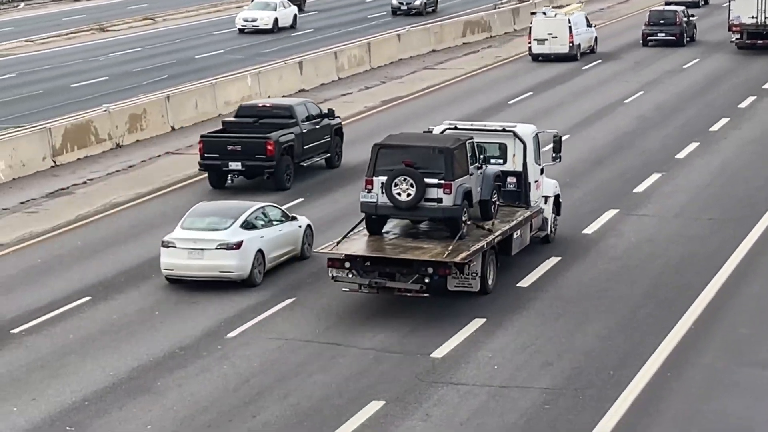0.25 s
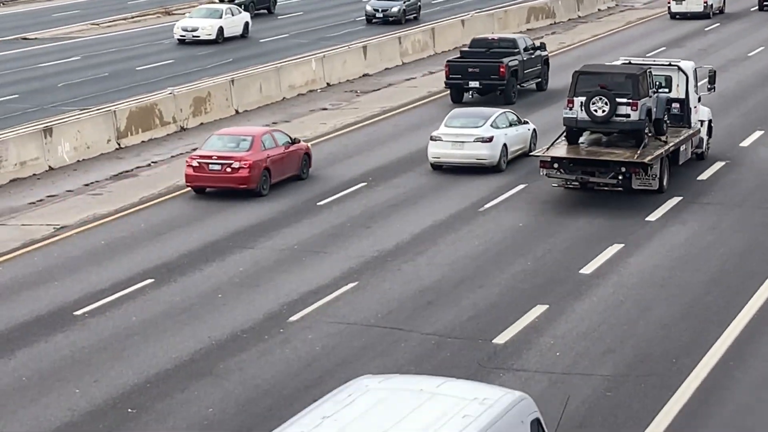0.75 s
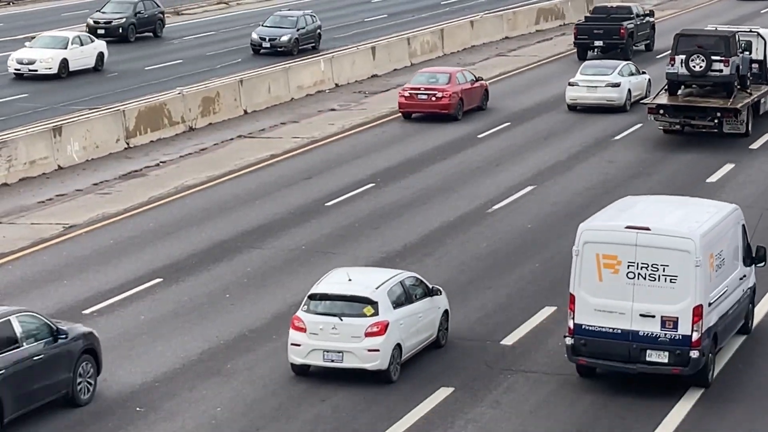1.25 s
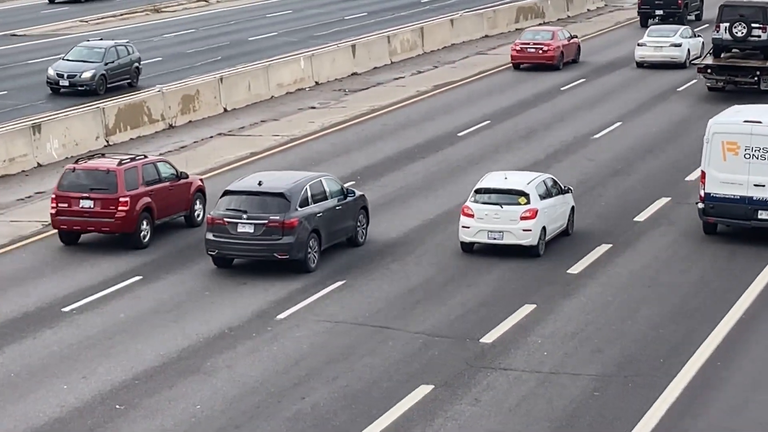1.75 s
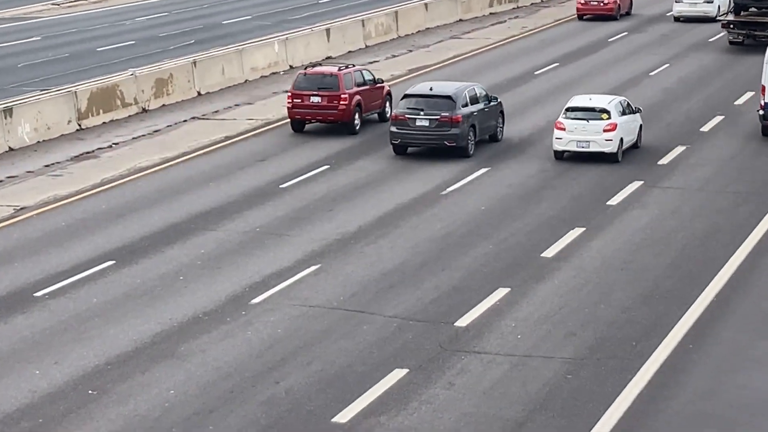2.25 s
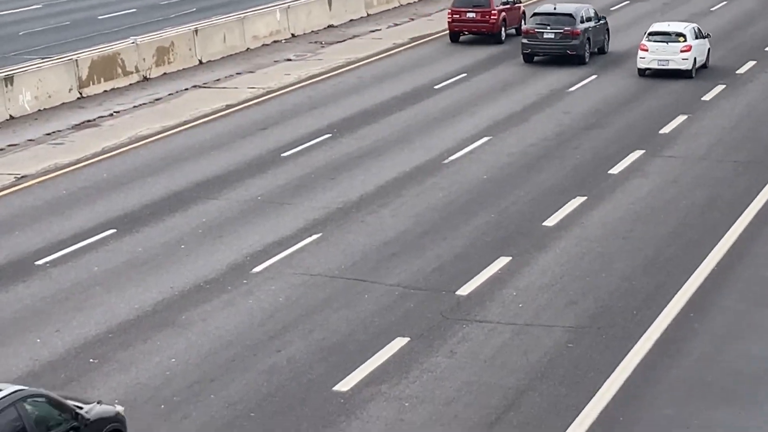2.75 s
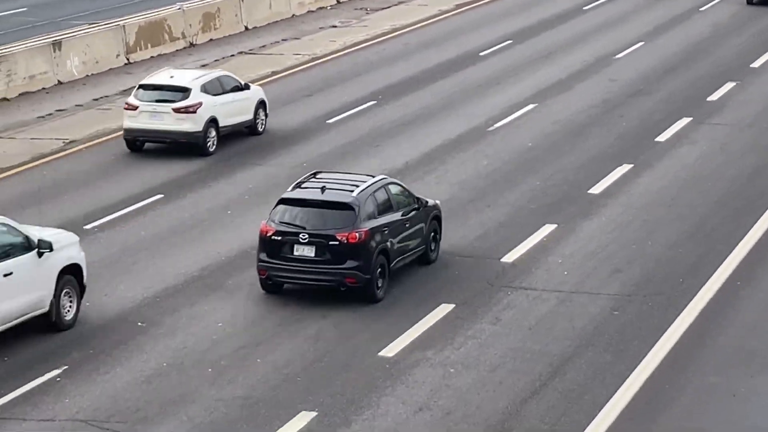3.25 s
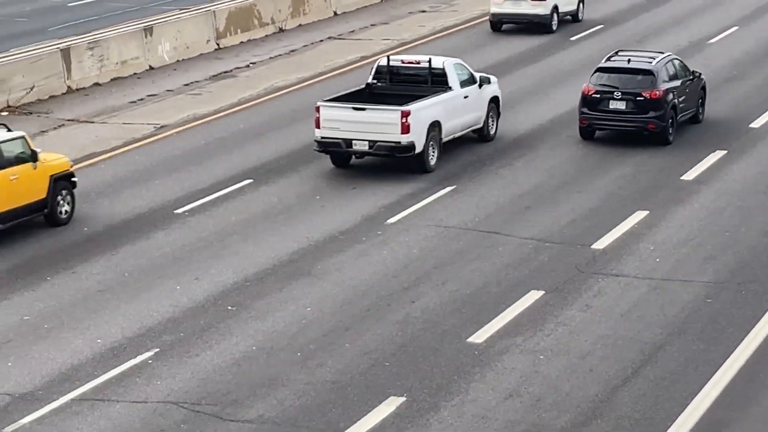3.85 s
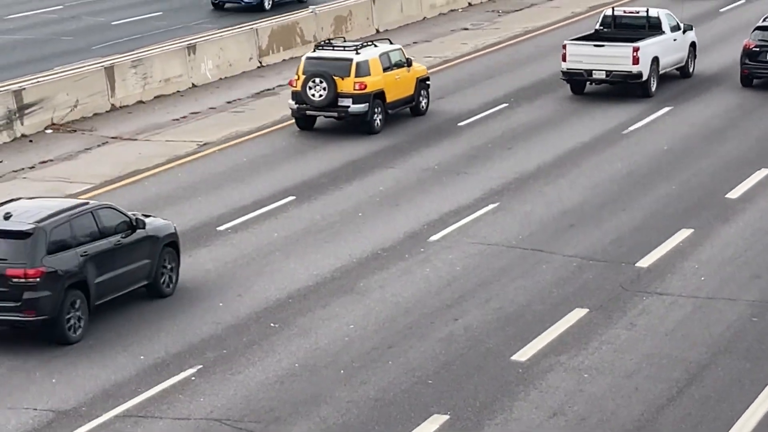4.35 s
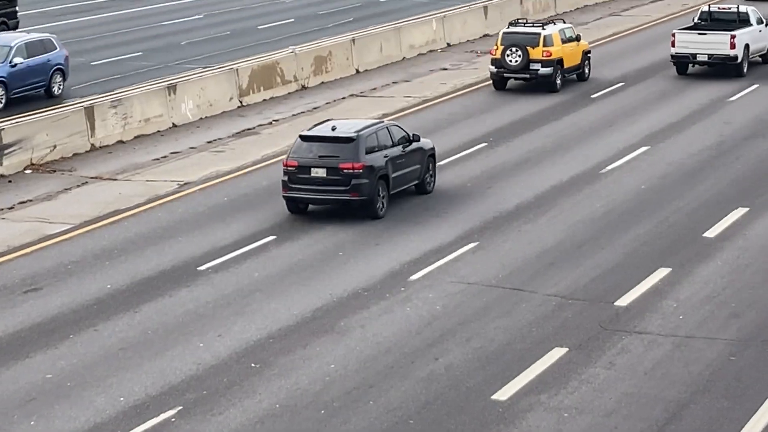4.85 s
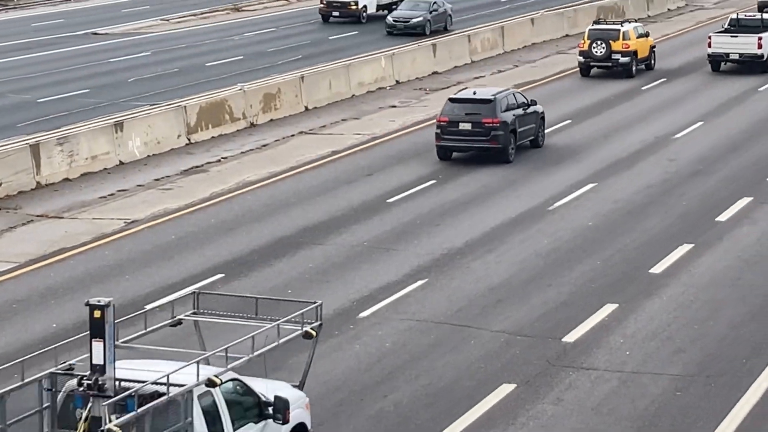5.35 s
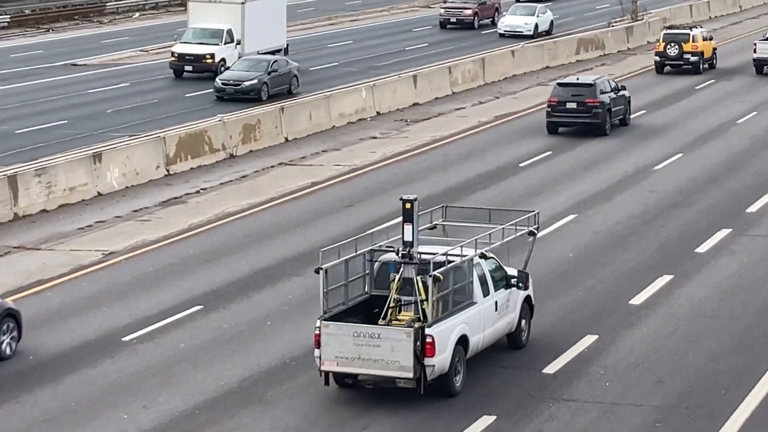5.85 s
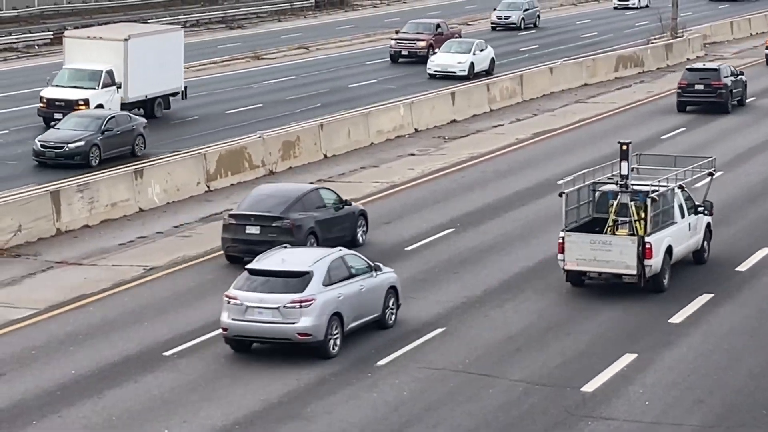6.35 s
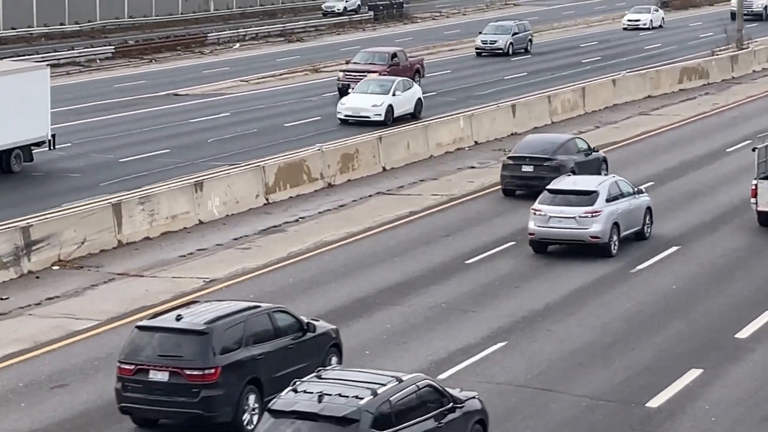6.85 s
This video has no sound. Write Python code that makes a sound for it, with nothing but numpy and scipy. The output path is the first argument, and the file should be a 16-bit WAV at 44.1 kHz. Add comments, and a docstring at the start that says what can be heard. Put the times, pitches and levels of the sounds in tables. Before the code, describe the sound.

Continuous multi-lane road noise with low exhaust rumble, a truck engine sinking in pitch, then a low boom and quick clunks over a road joint.

```python
"""An overpass above a multi-lane expressway, heard in stereo.
Tyres roar and hiss on the asphalt and exhausts rumble: shaped noise in random patches.
A truck engine sinks in pitch as it passes, over an exhaust drone and fainter notes: summed sine orders.
A work truck booms past as low noise; axles clunk over a road joint as short tone pulses, thumps and rattle."""
import sys
import numpy as np
from scipy import signal
from scipy.fft import rfft, irfft, next_fast_len
from scipy.io import wavfile
from scipy.ndimage import uniform_filter1d, map_coordinates

SR = 44100
rng = np.random.default_rng(int(sys.argv[2]) if len(sys.argv) > 2 else 0)


def to_wav(s):
    """Save 16-bit WAV."""
    ch = np.atleast_2d(s).T  # columns
    pcm = np.round(np.clip(ch, -1, 1) * 32767)  # PCM
    wavfile.write(sys.argv[1], SR, pcm.astype(np.int16))


N = 313110  # length in samples


def amp(db):
    """Decibels to gain."""
    return 10 ** (np.asarray(db) / 20)


def unit(x):
    """Scale to rms 1."""
    return x / np.sqrt(np.mean(x ** 2) + 1e-20)


def along(points, hz):
    """Read (f/Hz, value) points on a log frequency axis."""
    f, v = np.transpose(points)
    return np.interp(np.log(hz + 1), np.log(f + 1), v)


def curves(rows):
    """Draw one automation curve per column after the time, a value per sample."""
    s, *columns = np.transpose(rows)
    t = np.arange(N) / SR
    return [np.interp(t, s, column) for column in columns]


def wobble(rate):
    """A smooth random curve with `rate` knots a second."""
    knots = rng.standard_normal(int(N * rate / SR) + 4)
    return map_coordinates(knots, [np.arange(N) * rate / SR])


def filtered(x, response):
    """Filter x by a complex response of frequency."""
    m = next_fast_len(N + SR // 2)
    return irfft(rfft(x, m) * response(np.fft.rfftfreq(m, 1 / SR)), m)[..., :N]


def centred(x):
    """Place a mono sound wholly in the common part of the sound field."""
    return [[1], [0]] * x


def rush(spectrum, patchy_db, wide_hz, long_s):
    """Two unrelated noises, rms 1 overall, sharing random level patches: the common and scattered parts."""
    size, hop = 1024, 512
    noise = signal.stft(rng.standard_normal((2, N)), nperseg=size)[2]
    field = rng.standard_normal(noise.shape[1:])
    field = uniform_filter1d(field, max(1, round(wide_hz * size / SR)), 0)
    field = uniform_filter1d(field, max(1, round(long_s * SR / hop)), 1)
    patchy = noise * amp(patchy_db * unit(field))
    pair = signal.istft(patchy, nperseg=size)[1][:, :N]
    return unit(filtered(pair, lambda hz: amp(along(spectrum, hz))))


# low exhaust rumble, relative spectrum: f/Hz, level/dB
RUMBLE_SPECTRUM = [(22, -50), (32, -20), (42, -4), (50, -2.5), (62, 2), (100, -2), (150, -2.5), (195, -3),
                   (250, -5), (330, -8), (430, -14), (600, -37.5), (900, -71), (2000, -120)]
# hollow tyre roar, relative spectrum: f/Hz, level/dB
ROAR_SPECTRUM = [(150, -78), (300, -12), (420, -9.5), (550, -0.5), (700, 0.5), (800, -4.5), (950, -21),
                 (1500, -80)]
# tread whine, relative spectrum: f/Hz, level/dB
WHINE_SPECTRUM = [(400, -61), (750, -14.5), (870, 0), (1000, 2.5), (1200, 0), (1400, -5), (1800, -19),
                  (3000, -100)]
# tread sizzle, relative spectrum: f/Hz, level/dB
SIZZLE_SPECTRUM = [(600, -75), (1100, -11.5), (1400, 0.5), (1700, -0.5), (1900, -2.5), (2100, -8),
                   (2400, -22), (3500, -49), (6000, -100)]
# tyre hiss, relative spectrum: f/Hz, level/dB
HISS_SPECTRUM = [(1200, -42), (1900, -7.5), (2150, 0), (2400, 0.5), (2700, 0), (3000, -4.5), (3500, -7.5),
                 (3800, -8.5), (4500, -12), (5500, -20), (7000, -36.5), (10000, -93)]
# top air, relative spectrum: f/Hz, level/dB
AIR_SPECTRUM = [(3500, -41), (5200, -2), (6000, 0), (7000, -1), (9000, -8.5), (10000, -27.5),
                (11000, -57.5)]
# highest hiss, relative spectrum: f/Hz, level/dB
TOP_SPECTRUM = [(8000, -50.5), (9500, -3), (10000, 1), (11000, -2.5), (12300, -13.5), (14000, -36)]
# quick swells of the traffic, before trims: t/s, whine level/dB, air level/dB
QUICK_LEVELS = [(0, -29.5, -53), (.8, -30, -52), (1.18, -29.5, -52.5), (1.6, -31, -56), (2.1, -31.5, -57),
                (2.5, -28.5, -53.5), (3.05, -30.5, -53), (3.5, -28.5, -52), (3.9, -32, -55.5),
                (4.35, -33.5, -57), (4.73, -29, -57), (5.2, -31, -55), (5.55, -29.5, -54),
                (6.25, -29.5, -53), (6.6, -31, -52.5), (7.1, -34, -56)]
# slow mix, before trims: t/s, sizzle level/dB, roar level/dB, hiss level/dB, rumble level/dB
SLOW_LEVELS = [(0, -31, -29.5, -37, -24.5), (.25, -29.5, -31.5, -35, -26), (.5, -29.5, -30.5, -34.5, -25),
               (.75, -30.5, -32, -35.5, -29), (1, -30, -30.5, -35.5, -26.5),
               (1.5, -30.5, -32.5, -36.5, -27), (2, -31, -29.5, -36, -28), (2.5, -30.5, -31.5, -36, -26),
               (2.85, -29, -32, -36.5, -27), (3.2, -31.5, -31.5, -37, -26.5),
               (3.55, -29, -31.5, -38, -23.5), (3.9, -31, -31.5, -39, -27), (4.3, -28, -31.5, -36.5, -27),
               (4.65, -28, -29.5, -36, -25.5), (4.9, -26.5, -29.5, -35.5, -25),
               (5.15, -30, -29, -36.5, -25), (5.45, -28, -29, -36, -24), (5.8, -29.5, -30, -37, -27),
               (6.1, -28.5, -31, -38, -25), (6.45, -29, -29.5, -37, -25),
               (6.75, -28.5, -31.5, -36.5, -24.5), (7.1, -26.5, -27, -36, -25.5)]
# highest hiss, before flutter: t/s, level/dB
TOP_LEVEL = [(0, -65), (.5, -66), (1.1, -67), (1.7, -75), (2.1, -73.5), (2.6, -65.5), (3.5, -67.5),
             (4.2, -74.5), (4.7, -71.5), (5.5, -66.5), (6.5, -64.5), (7.1, -67.5)]


def stream():
    """Many tyres and exhausts at once: patchy noise bands riding the traffic, the treble fluttering together."""
    whine_db, air_db = curves(QUICK_LEVELS)
    sizzle_db, roar_db, hiss_db, rumble_db = curves(SLOW_LEVELS)
    top_db, = curves(TOP_LEVEL)
    # roar rides the swells of the whine, hiss those of the air (dB per dB)
    roar_db = roar_db + .4 * (whine_db - whine_db.mean())
    hiss_db = hiss_db + .49 * (air_db - air_db.mean())
    flutter = wobble(9)
    rumble = amp(rumble_db) * rush(RUMBLE_SPECTRUM, patchy_db=-.3, wide_hz=130, long_s=.14)
    roar = amp(roar_db + 2) * rush(ROAR_SPECTRUM, patchy_db=1.5, wide_hz=130, long_s=.08)
    whine = amp(whine_db + 4) * rush(WHINE_SPECTRUM, patchy_db=2, wide_hz=130, long_s=.07)
    sizzle = amp(sizzle_db + 2) * rush(SIZZLE_SPECTRUM, patchy_db=1.55, wide_hz=170, long_s=.06)
    hiss = amp(hiss_db + 3.5 + .33 * flutter) * rush(HISS_SPECTRUM, patchy_db=1.66, wide_hz=170, long_s=.06)
    air = amp(air_db + 4 + .27 * flutter) * rush(AIR_SPECTRUM, patchy_db=1.5, wide_hz=600, long_s=.07)
    top = amp(top_db + .5 * flutter) * rush(TOP_SPECTRUM, patchy_db=1.8, wide_hz=300, long_s=.025)
    return rumble + roar + whine + sizzle + hiss + air + top


def engine(start, pitch_hz, levels_db, orders, waver, fading_db):
    """Engine orders as sines whose phase and level drift along the changing path; silent before start."""
    turn = 2 * np.pi * np.cumsum(pitch_hz) / SR
    tone = 0
    for order, level_db, fade_db in zip(orders, levels_db, fading_db):
        level = amp(level_db + fade_db * (wobble(8) - 1)) * np.sqrt(2)  # rms to peak
        drift = waver * order ** 2 * wobble(12)
        tone = tone + level * np.sin(order * turn + drift + rng.uniform(0, 2 * np.pi))
    fade_in = np.clip((np.arange(N) / SR - start) / .098, 0, 1)
    return centred(tone * fade_in)


# three fainter engine notes, each before fading: t/s, f/Hz, level/dB
FAINT_NOTES = [
    [(2.2, 332.6, -49), (2.55, 328.4, -32.5), (2.75, 329, -34), (2.88, 330, -47), (3.0, 329, -37),
     (3.1, 328, -49), (3.22, 327, -37.5), (3.4, 326, -49), (7.1, 324.6, -70)],
    [(4.3, 114, -41), (5.0, 110.1, -28.5), (5.7, 109.1, -30.5), (6.6, 110, -40), (7.1, 108.7, -40.5)],
    [(5.9, 288.2, -45), (6.3, 291.3, -33), (6.7, 290, -41.5), (7.1, 291.5, -25.5)],
]


def faint_notes():
    """Single engine orders that drone through with drifting pitch."""
    total = 0
    for rows in FAINT_NOTES:
        pitch_hz, level_db = curves(rows)
        total = total + engine(rows[0][0], pitch_hz, [level_db], [1], waver=.22, fading_db=[2.5])
    return total


# low exhaust drone of the nearer vehicles, before fading: t/s, f/Hz, level/dB
EXHAUST_DRONE = [(0, 60.3, -41), (.23, 60.5, -30.5), (.6, 60.5, -34), (1.0, 60.5, -31.5), (1.15, 60.7, -45),
                 (1.35, 60.5, -26.5), (1.55, 60.9, -37), (1.75, 60.6, -31.5), (2.05, 61, -29.5),
                 (2.3, 61.6, -50), (2.6, 61.6, -27), (2.9, 62.2, -25.5), (3.15, 61.3, -37),
                 (3.5, 61.7, -29.5), (3.85, 62, -35), (4.05, 62.3, -33), (4.4, 62, -28.5),
                 (4.55, 62, -25.5), (4.75, 61.4, -28), (4.9, 61, -24.5), (5.03, 60.8, -20.5),
                 (5.2, 60.3, -23), (5.36, 60.1, -19), (5.45, 59.8, -25), (5.55, 59.5, -22.5),
                 (5.7, 59, -25.5), (5.95, 57.3, -30.5), (6.5, 55.5, -30), (7.1, 55.3, -40)]
# its second order, before fading: t/s, level/dB
DRONE_SECOND = [(0, -36.5), (1.3, -34), (2, -56), (4, -42), (7.1, -36)]


def exhaust_drone():
    """Exhaust pulses of the nearer vehicles as a low note and its octave."""
    pitch_hz, first_db = curves(EXHAUST_DRONE)
    second_db, = curves(DRONE_SECOND)
    # a start before zero leaves the drone running from the first sample
    return engine(-1, pitch_hz, [first_db, second_db], [1, 2], waver=.12, fading_db=[.8, 4])


# passing truck engine, before fading: t/s, firing f/Hz, level/dB of orders 1, 1.5 and 3
TRUCK_ENGINE = [(1.4, 103.9, -43, -43, -46), (1.85, 105, -32, -39, -48), (2.2, 103, -40, -56, -32),
                (2.4, 102.6, -28.5, -40, -37), (2.55, 102.2, -28.5, -37, -30), (2.64, 101.5, -39, -37, -32),
                (2.74, 100.2, -23.5, -42, -33), (2.85, 99.2, -21.5, -45, -39),
                (2.94, 98.3, -25.5, -32, -29), (3.02, 97.4, -30, -30.5, -29), (3.12, 96.2, -26, -33, -31.5),
                (3.25, 94.3, -29.5, -32, -39), (3.4, 92.8, -25, -49, -35), (3.7, 91.4, -29.5, -34, -36),
                (4.0, 90.8, -28, -34, -38.5), (4.3, 90.5, -27, -43, -33.5), (4.65, 90.5, -35.5, -45, -38),
                (5.05, 90.8, -26.5, -32, -39), (5.3, 90.5, -38, -42, -36), (5.7, 90.4, -26, -39, -51),
                (6.0, 90.5, -41.5, -45, -48), (6.7, 90.5, -29, -43, -49), (7.1, 90.5, -35, -35.5, -49)]
# its second order, swelling and fading along the way, before fading: t/s, level/dB
TRUCK_SECOND = [(1.4, -40), (1.58, -29.5), (1.78, -39), (1.9, -30), (2.08, -35.5), (2.16, -22.5),
                (2.23, -20.5), (2.32, -40), (2.42, -22), (2.52, -26.5), (2.63, -32), (2.85, -32),
                (3.1, -22), (3.2, -30), (3.3, -15.5), (3.4, -19.5), (3.52, -16), (3.7, -26.5), (3.78, -19),
                (3.9, -22), (3.98, -30.5), (4.1, -21), (4.3, -21), (4.5, -26), (4.62, -18.5), (4.85, -21.5),
                (5.02, -21.5), (5.1, -29), (5.25, -29.5), (5.38, -32.5), (5.55, -19.5), (5.65, -26.5),
                (5.8, -20), (5.92, -26.5), (6.1, -26), (6.33, -28.5), (6.45, -38), (6.6, -29), (6.7, -41),
                (6.8, -25.5), (6.9, -31), (7.1, -27)]
# multiples of the firing rate that sound [ratio]
ORDERS = [1, 1.5, 2, 3]


def truck_engine():
    """Orders of the firing rate, sinking in pitch from approach to retreat."""
    firing_hz, first_db, half_db, third_db = curves(TRUCK_ENGINE)
    second_db, = curves(TRUCK_SECOND)
    levels_db = [first_db, half_db, second_db, third_db]
    return engine(TRUCK_ENGINE[0][0], firing_hz, levels_db, ORDERS, waver=.045, fading_db=[1, 2.5, .5, 3])


# low noise around 260 Hz that fades early and returns slightly: t/s, level/dB
LOW_NOISE = [(0, -37.5), (1.5, -49), (5.9, -44), (7.1, -41)]


def low_boom():
    """Low noise around 260 Hz, swelling for a work truck whose gain falls with distance squared."""
    closest_s, closest_db, speed_mps, distance_m = 5.2, -27.5, 18.6, 11.3
    # f/Hz, level/dB
    shape = [(100, -120), (160, -22.5), (210, 6.5), (262, 11), (290, 6.5), (360, -27), (700, -120)]
    t = np.arange(N) / SR
    steady_db, = curves(LOW_NOISE)
    work_truck = amp(closest_db) / (1 + ((t - closest_s) * speed_mps / distance_m) ** 2)
    level = np.hypot(amp(steady_db), work_truck)
    return level * rush(shape, patchy_db=4.5, wide_hz=90, long_s=.06)


# axles over a road joint: t/s, clunk peak level/dB, clunk f/Hz, clunk length/s, thump envelope level/dB
JOINT_HITS = [(1.469, -21, 1320, .018, -36), (4.7, -25, 700, .01, -32), (4.8, -21, 720, .016, -29),
              (4.84, -22, 870, .016, -34), (5.07, -17, 736, .024, -23), (5.09, -22, 650, .018, -32),
              (5.381, -23, 765, .016, -19), (5.396, -20, 670, .016, -18), (5.414, -23, 800, .013, -22),
              (5.433, -20, 580, .018, -15), (5.452, -22, 740, .014, -21)]


def joint_clunks():
    """Each axle gives a short tyre clunk over a low thump and a puff of body rattle."""
    # f/Hz, level/dB
    shape = [(60, -56), (200, .5), (400, -8.5), (650, -1.5), (950, 1), (1500, -16), (4000, -120)]
    rattle = rush(shape, patchy_db=-2, wide_hz=90, long_s=.06)
    t = np.arange(N) / SR
    total = 0
    for s, clunk_db, hz, length, thump_db in JOINT_HITS:
        after = t - s
        clunk = amp(clunk_db) * np.exp(-(after / length * 2) ** 2) * np.cos(2 * np.pi * hz * after)
        thump = amp(thump_db) * np.exp(-(after / .012) ** 2) * np.sin(2 * np.pi * 86 * after)
        puff = .45 * amp(clunk_db) * np.exp(-(after / length * 1.2) ** 2) * rattle
        total = total + centred(clunk + thump) + puff
    return total


def scene():
    """Sum the layers as the common and scattered parts of the sound field."""
    engines = faint_notes() + exhaust_drone() + truck_engine()
    return stream() + engines + low_boom() + joint_clunks()


# stereo image by frequency: f/Hz, left-right likeness [0-1], phase by which right leads [rad]
STEREO_IMAGE = [(0, .99, .37), (215, .975, .17), (430, .87, -.3), (750, .78, .75), (820, .15, -.3),
                (880, .65, -1.25), (1230, .85, -1.3), (1640, .65, .03), (1900, .75, .25), (2250, .17, -2.3),
                (2450, .25, -3.4), (2700, .47, -5.05), (2900, .22, -6), (3100, .06, -5.3),
                (3500, .08, -4.5), (3750, .35, -5.5), (4200, .4, -5.9), (4650, .36, -5.6), (5000, .03, -4),
                (5200, .4, -2.65), (5850, .57, -2.7), (6250, .08, -1.5), (6600, .55, 0), (7050, .87, .2),
                (7500, .76, .6), (8300, .74, 2.2), (8800, .995, 3.14), (9550, .995, 3.14), (10250, .42, 5),
                (10750, .97, 6.28), (12000, .97, 6.3), (12500, .3, 7.8), (13100, .98, 9.42)]
# left minus right: f/Hz, level/dB
LEFT_LEAN = [(200, 1.6), (300, .6), (780, .5), (980, 1.6), (1600, 1.8), (2250, 1), (3050, 5.8), (3700, 1),
             (5900, -.9), (7500, .4)]


def record(dry):
    """Left and right share the common part with a phase offset and take the scattered part in opposition."""
    top_hz = 13800  # upper frequency limit
    f, alike, lead = np.transpose(STEREO_IMAGE)
    side = np.array([[-1], [1]])  # left, right

    def mix_angle(hz):
        """Angle that sets common against scattered for the wanted likeness."""
        return np.arccos(np.clip(np.interp(hz, f, alike), 0, 1)) / 2

    def channel(hz):
        """Phase and level between left and right by frequency, with the upper limit."""
        phase = np.exp(.5j * side * np.interp(hz, f, lead))
        return phase * amp(-side * along(LEFT_LEAN, hz) / 2) * (hz < top_hz)

    common = filtered(dry[0], lambda hz: np.cos(mix_angle(hz)) * channel(hz))
    scattered = filtered(dry[1], lambda hz: side * np.sin(mix_angle(hz)) * channel(hz))
    return common + scattered


dry = scene()
out = record(dry)
to_wav(out)
```